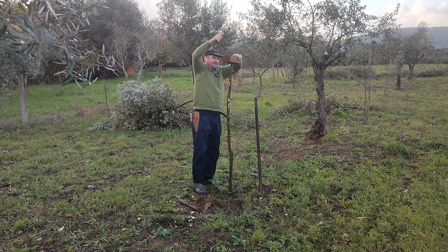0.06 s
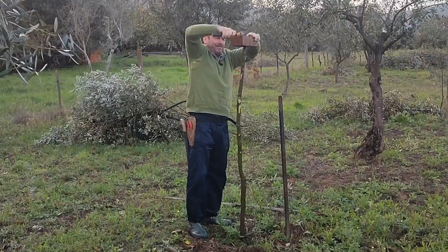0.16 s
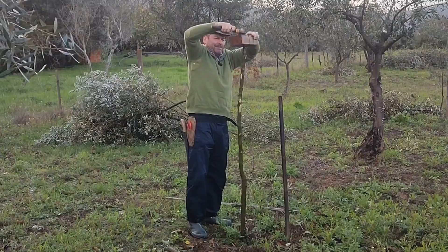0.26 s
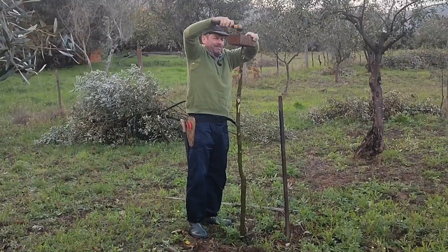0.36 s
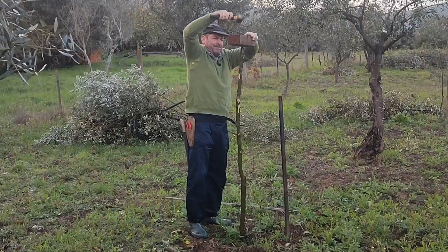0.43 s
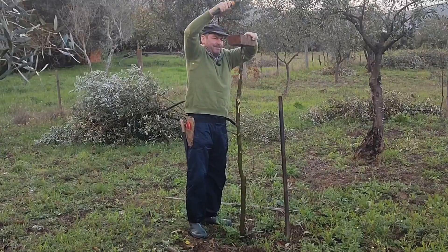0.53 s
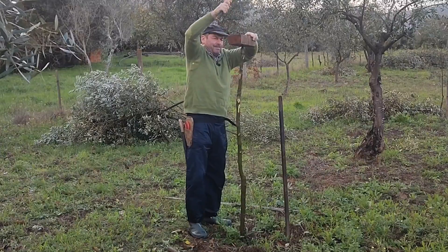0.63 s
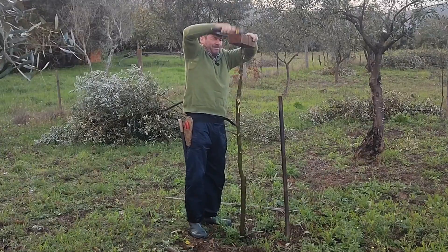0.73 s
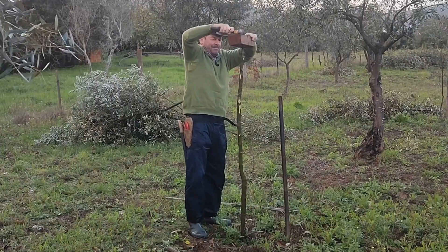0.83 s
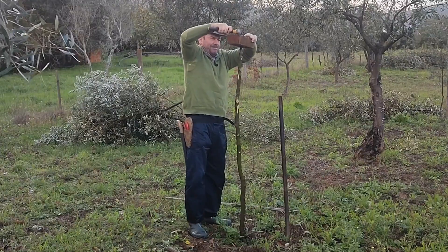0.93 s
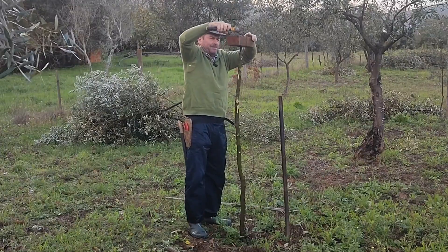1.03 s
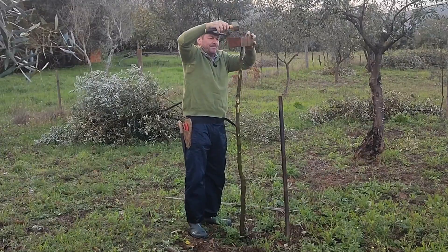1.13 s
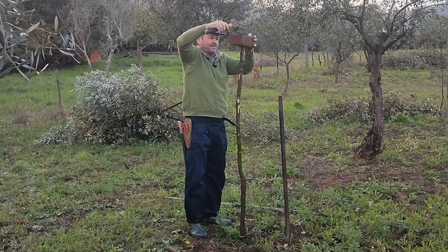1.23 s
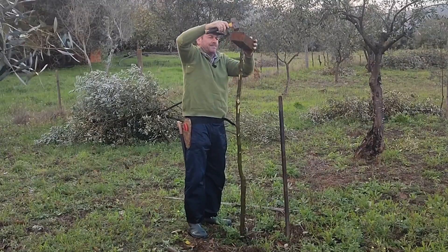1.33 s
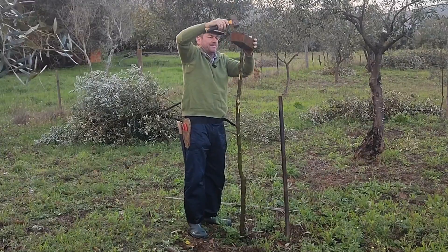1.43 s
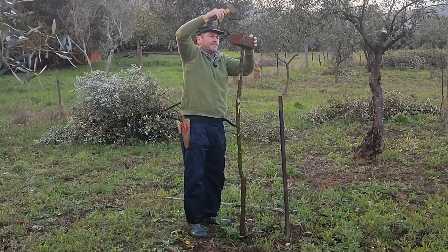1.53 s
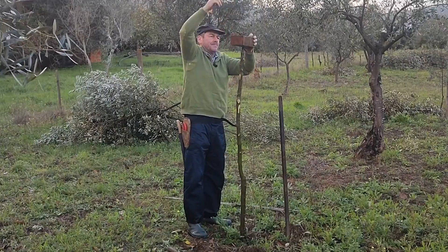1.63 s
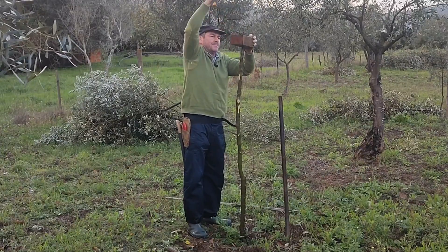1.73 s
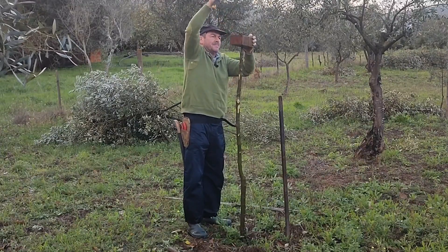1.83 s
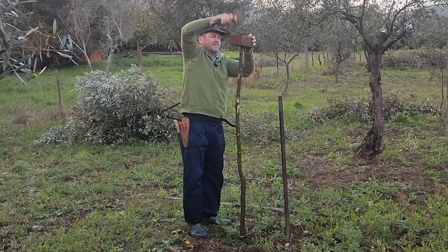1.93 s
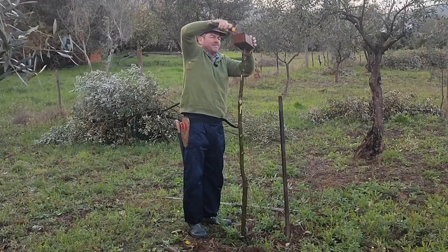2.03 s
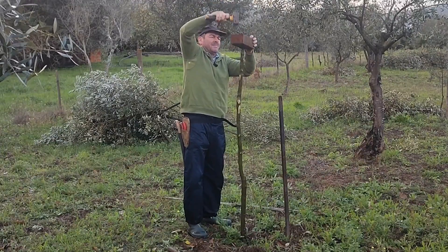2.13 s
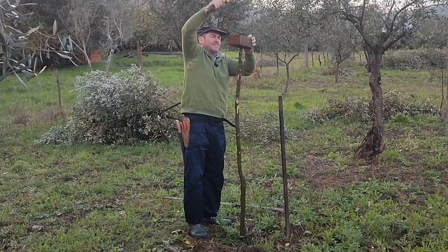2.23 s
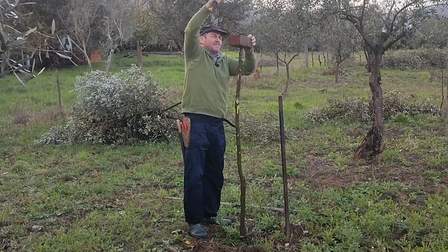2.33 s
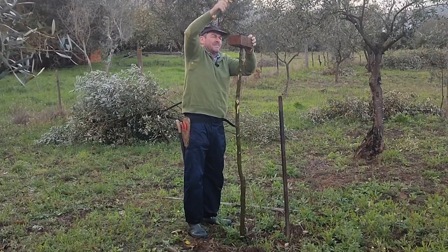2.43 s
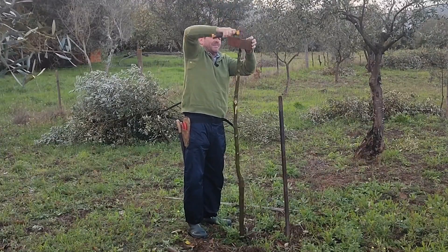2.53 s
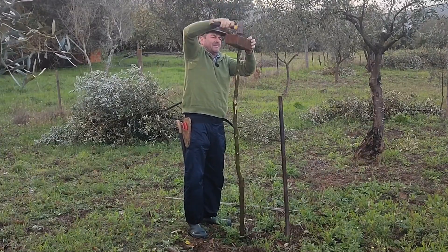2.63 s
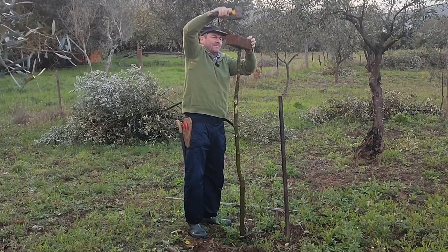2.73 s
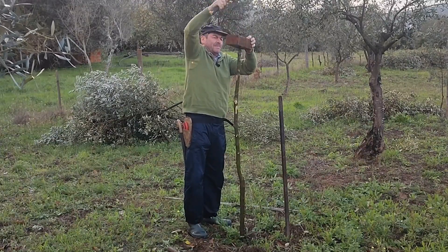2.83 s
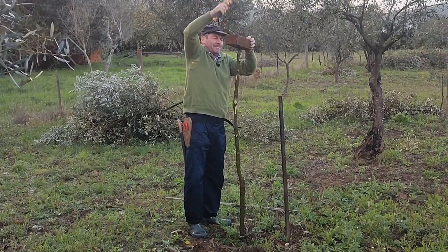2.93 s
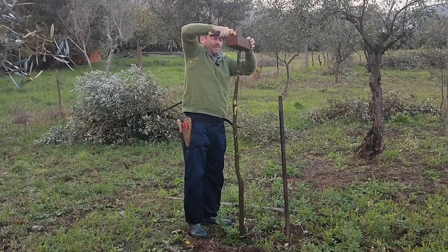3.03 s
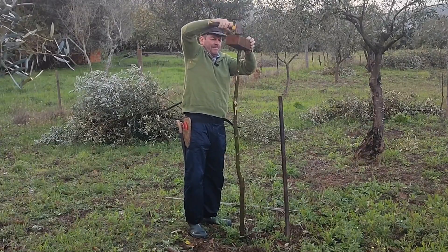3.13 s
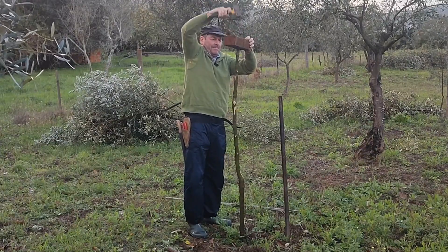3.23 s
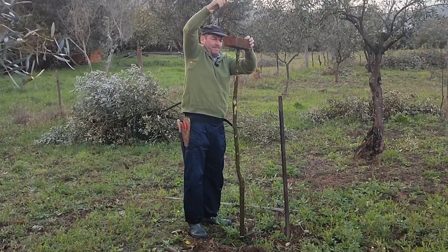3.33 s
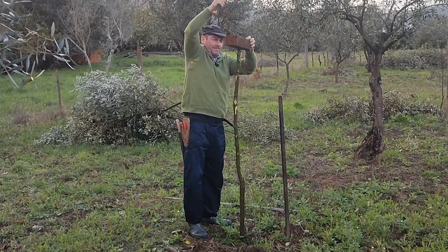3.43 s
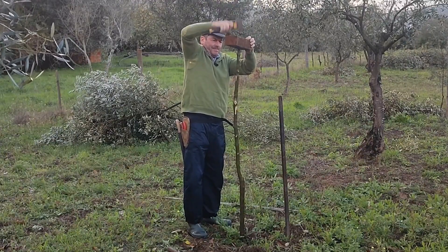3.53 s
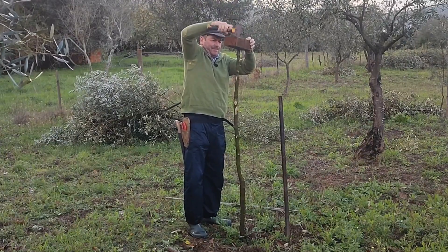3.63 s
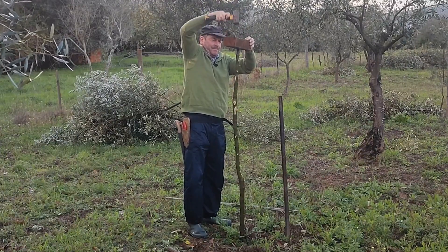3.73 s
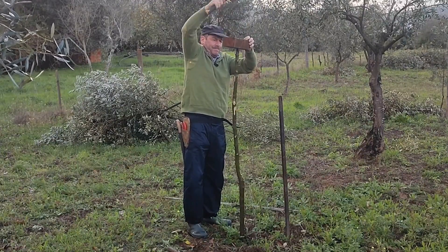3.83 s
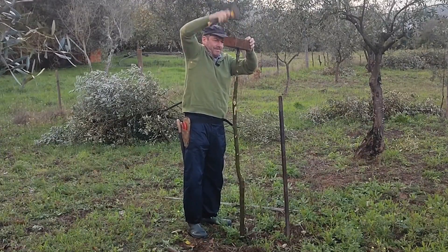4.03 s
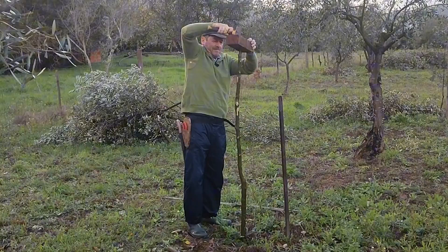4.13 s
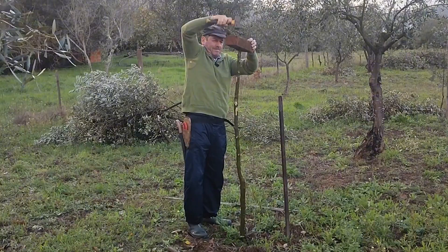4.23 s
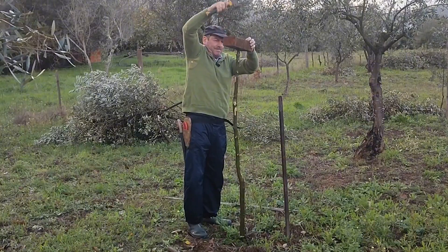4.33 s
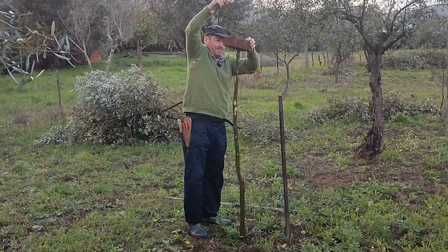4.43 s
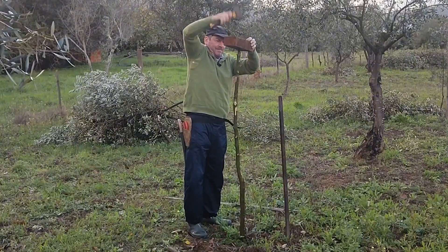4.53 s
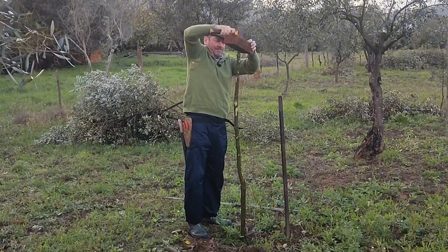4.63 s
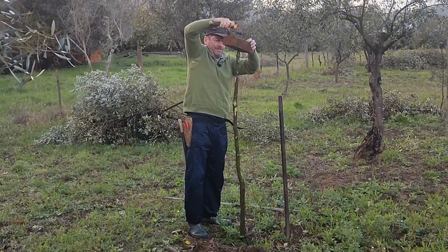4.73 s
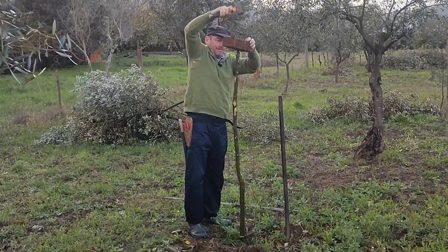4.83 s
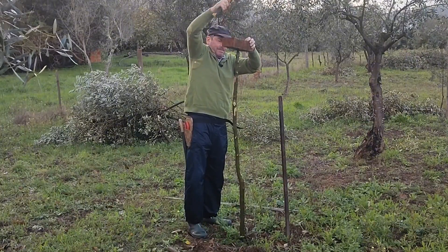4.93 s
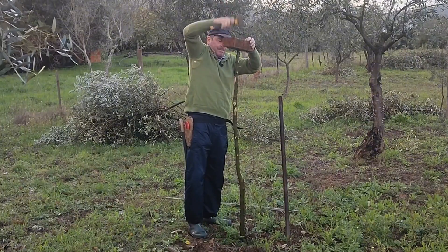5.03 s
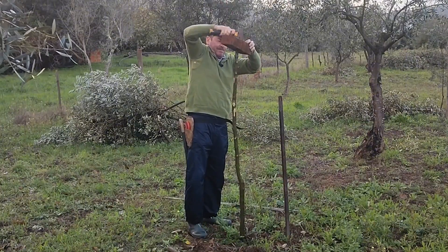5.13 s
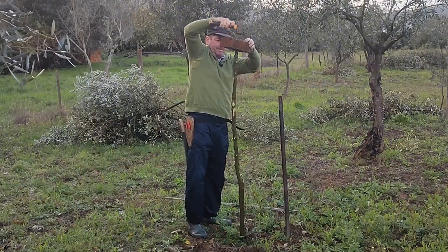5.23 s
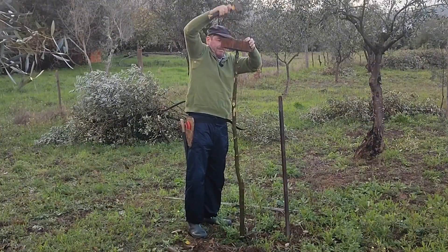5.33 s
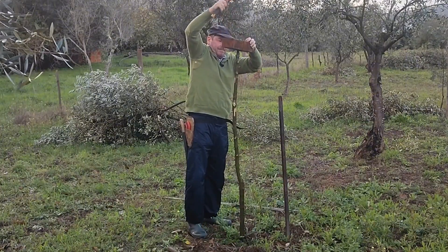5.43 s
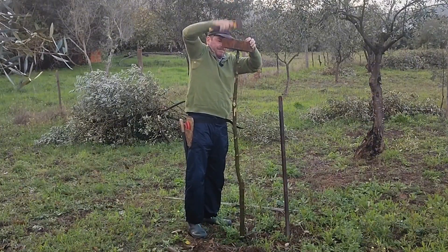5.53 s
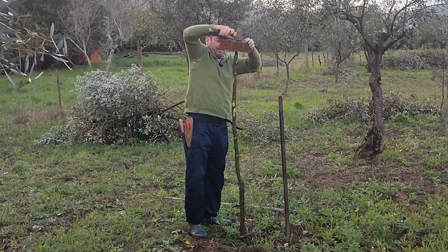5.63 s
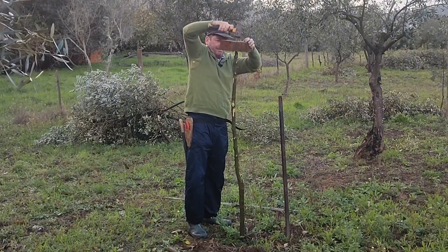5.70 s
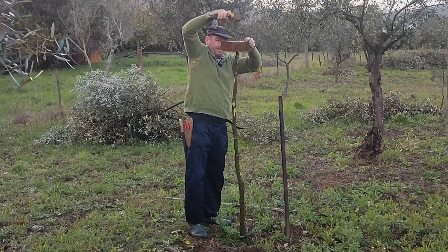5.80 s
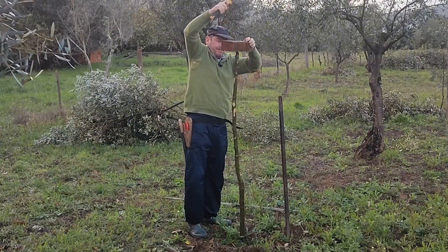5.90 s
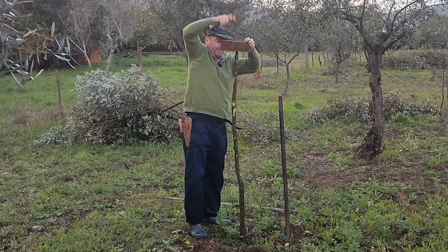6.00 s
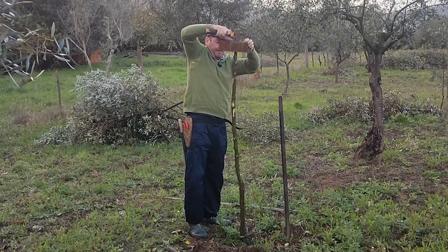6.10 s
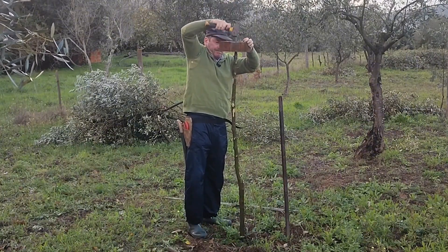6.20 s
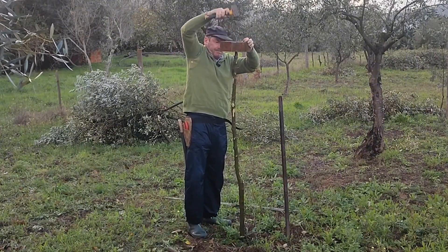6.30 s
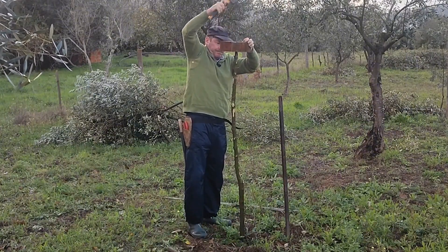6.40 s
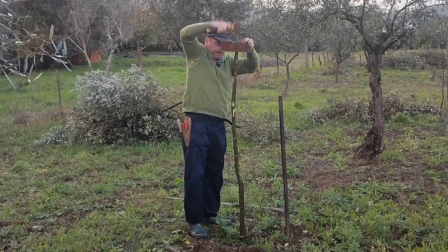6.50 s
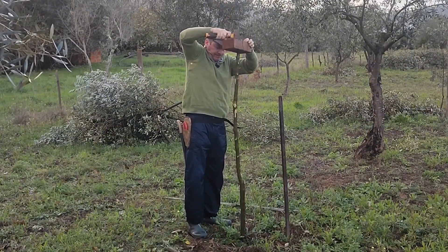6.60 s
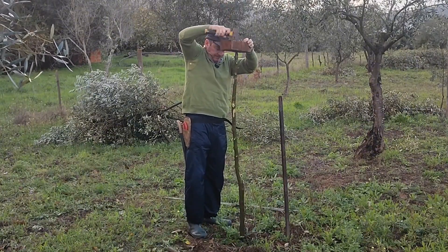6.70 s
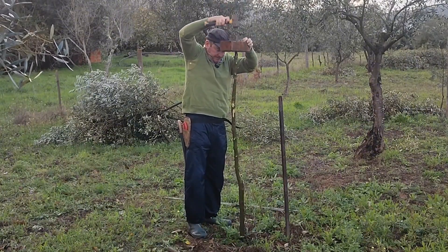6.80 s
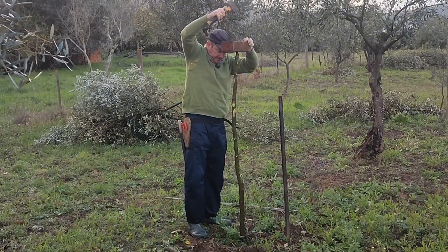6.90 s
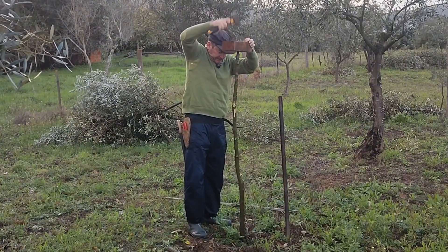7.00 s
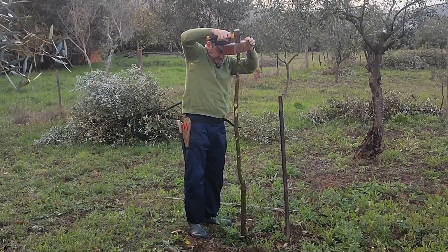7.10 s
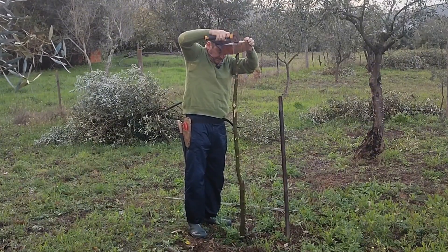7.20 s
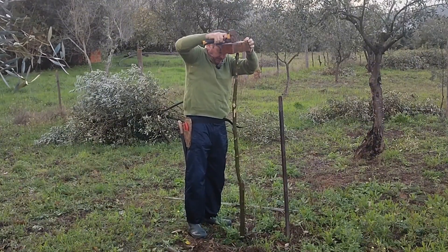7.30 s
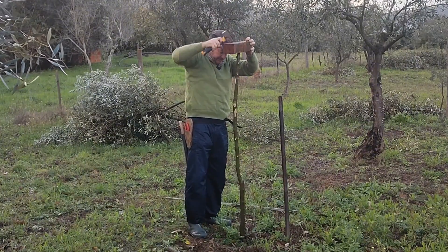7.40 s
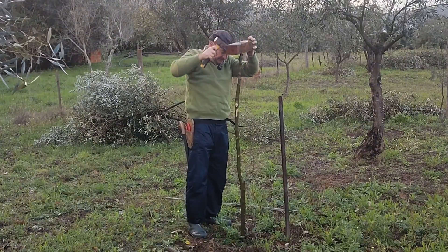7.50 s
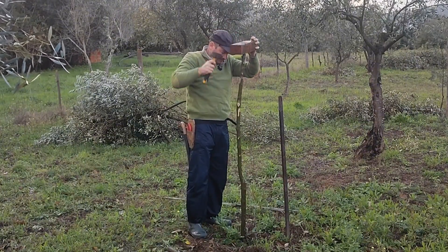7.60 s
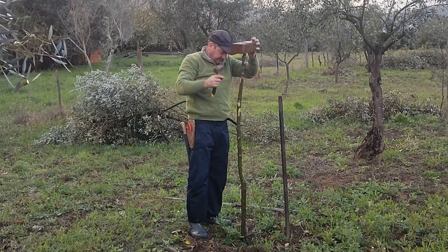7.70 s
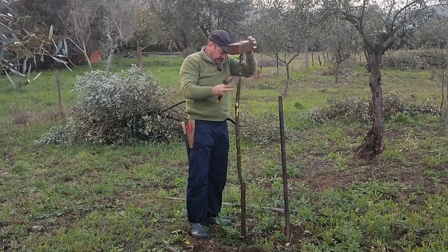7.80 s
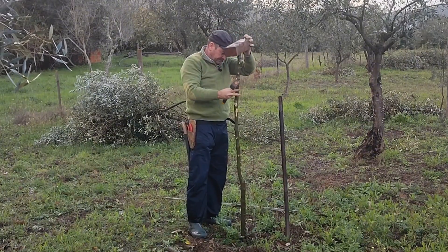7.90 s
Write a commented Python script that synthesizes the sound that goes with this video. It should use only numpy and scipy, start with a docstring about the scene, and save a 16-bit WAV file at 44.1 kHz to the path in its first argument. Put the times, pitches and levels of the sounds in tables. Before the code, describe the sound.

In an open field with scattered trees, a hammer strikes a wooden block on a slim stake thirteen times. Each blow is a short, hollow wooden knock with a bright click, brief rattle and dull thud from the soil, trailing a faint echo off the trees. Low wind buffets the microphone unevenly left and right, over quiet hiss. A far bird calls hoarsely twice, late.

```python
"""Driving a stake in an open field

A hammer strikes a wood block on a slim wooden stake in soft soil, thirteen times.
Each blow runs down the stake as a bending wave, highs first; filters and noise bursts add the ringing
wood, clicks, rattle, a dull return from the soil and a faint echo scattered by trees.
A far bird gives two hoarse harmonic calls. Noise shaped by the breeze buffets two microphone ports,
over a quiet hiss and a soft rush of the field.
"""
import sys
import numpy as np
from scipy import signal
from scipy.fft import rfft, irfft
from scipy.io import wavfile
from scipy.ndimage import uniform_filter1d

SR = 44100
rng = np.random.default_rng(int(sys.argv[2]) if len(sys.argv) > 2 else 0)


def wav_record(signal):
    """Record a signal, one row per channel, as 16-bit PCM in the file named by sys.argv[1]."""
    frames = np.transpose(np.atleast_2d(signal))
    bounded = np.clip(frames, -1, 1)
    # unit amplitude maps onto the largest positive 16-bit level
    quanta = np.round(bounded * 32767).astype(np.int16)
    wavfile.write(sys.argv[1], SR, quanta)


N = 350595  # length in samples


def undb(db):
    """Amplitude ratio: 20 dB is a factor of ten."""
    return 10 ** (np.asarray(db) / 20)


def unit(x):
    """Normalisation to unit mean power, that is rms 1."""
    return x / np.sqrt(np.mean(x ** 2))


def gains(points, size):
    """Frequency response at each FFT bin: (Hz, dB) points joined on a log frequency axis."""
    hz, db = np.transpose(points)
    bin_hz = np.fft.rfftfreq(size, 1 / SR) + 1e-9
    return undb(np.interp(np.log(bin_hz), np.log(hz), db))


def colour(x, points):
    """Zero-phase filtering: multiply the spectrum by the gains of (Hz, dB) points."""
    size = x.shape[-1]
    return irfft(rfft(x) * gains(points, size), size)


def causal(gain):
    """Minimum phase: folding the cepstrum gives a filter that does not sound before it is struck."""
    cepstrum = irfft(np.log(gain))
    half = len(cepstrum) // 2
    cepstrum[1:half] *= 2
    cepstrum[half + 1:] = 0
    return np.exp(rfft(cepstrum))


def pair(size, likeness):
    """Interchannel correlation: common and opposed noise mixed to the given likeness."""
    mid, side = rng.standard_normal((2, size))
    c = np.clip(likeness, 0, 1)
    common = np.sqrt(1 + c) * mid
    opposed = np.sqrt(1 - c) * np.array([side, -side])
    return (common + opposed) / np.sqrt(2)


def walk(rate):
    """Slow random modulation of rms 1: values held 1 / rate seconds, then smoothed twice."""
    hold = max(int(SR / rate), 1)
    steps = np.repeat(rng.standard_normal(N // hold + 1), hold)
    smooth = uniform_filter1d(uniform_filter1d(steps, hold), hold)
    return unit(smooth[:N])


def burst(t, rise_s, t60, likeness):
    """Diffuse decay: spectrum of stereo noise that swells, then falls 60 dB in t60 seconds."""
    shape = (1 - np.exp(-t / rise_s)) * np.exp(-np.log(1000) * t / t60)
    energy = np.sum(shape ** 2)
    return rfft(pair(len(t), likeness) * shape / np.sqrt(energy))


def late(f, s):
    """Pure delay of s seconds: a phase lag proportional to frequency."""
    return np.exp(-2j * np.pi * f * s)


def breeze():
    """Slowly varying flow: strength and left-minus-right lean, interpolated in dB at every sample."""
    # Breeze at the microphone. Each row: time in seconds, relative strength in dB, left minus right in dB.
    breeze_points = [(0.0, -48, -15), (0.38, -42, 7.5), (0.8, -37.5, -14.5), (1.3, -51, 18),
                     (1.8, -45.5, 7), (1.9, -68.5, 8.5), (2.6, -74.5, 7), (2.75, -47.5, 1),
                     (3.199, -42, -8.5), (3.65, -44.0, 19), (3.95, -46.5, 11.5), (4.3, -47, -12),
                     (5.05, -56, -6.5), (5.3, -43.5, -5), (5.85, -32, 2), (6.3, -41.5, 6),
                     (6.85, -49.0, -5), (7.42, -38.5, -15.5), (7.52, -52.5, 1.0), (7.95, -57, -0.5)]
    s, strength_db, lean_db = np.transpose(breeze_points)
    t = np.arange(N) / SR
    return np.interp(t, s, strength_db), np.interp(t, s, lean_db)


def air(hiss_db=-52, field_db=-63, breeze_share=0.22):
    """Stationary noise: steady hiss, and a rush alike in both channels that rises with the breeze."""
    # Still air of the field and microphone hiss. Each row: frequency in Hz, relative level in dB.
    hiss_points = [(20, -8), (60, -14), (180, -2.5), (300, -11.5), (480, 3), (1300, -1.5), (2100, 3),
                   (2900, -7.5), (4500, -1), (5000, -11), (6500, -13.5), (7800, -32.5), (10000, -36.5),
                   (11000, -24.5), (16000, -35)]
    rush_points = [(80, -23), (250, 7), (450, 5.0), (1600, -31.5), (3000, -37.0), (7000, -53)]
    breeze_db = uniform_filter1d(breeze()[0], SR // 4)
    hiss = unit(colour(pair(N, likeness=0.02), hiss_points))
    rush = unit(colour(pair(N, likeness=1.0), rush_points))
    rush_db = field_db + breeze_share * (breeze_db - breeze_db.mean()) + walk(0.86)
    return undb(hiss_db) * hiss + undb(rush_db) * rush


def eddy_noise(points, hold_s):
    """Turbulence: coloured noise whose power is evened out by its running mean over hold_s."""
    noise = colour(rng.standard_normal(N), points)
    power = uniform_filter1d(noise ** 2, max(int(hold_s * SR), 1))
    return noise / np.sqrt(power + 1e-18)


def wind(wind_db=0.5, flutter_db=5.0, eddy_db=-12, eddy_growth=0.21):
    """Flow noise: each port has its own lumps and eddies; stronger flow raises the higher eddies."""
    # Wind rumble. Each row: frequency in Hz, relative level in dB.
    rumble_points = [(12, -42), (25, -30), (42, -3), (60, 0), (110, -4.5), (160, -13.5), (220, -18.5),
                     (300, -25.5), (450, -46), (900, -91.5)]
    # Single eddies that thump a port. Each row: centre in seconds, relative left and right level in dB.
    buffets = [(0.38, -39.5, -33), (0.53, -36, -36), (0.622, -22.5, -47), (1.82, -53, -33),
               (2.688, -35.5, -46.5), (4.437, -34.5, -22), (5.84, -25.5, -23), (7.422, -35.5, -27)]
    eddy_points = [(60, -8), (135, 4.5), (185, -2.5), (260, -23.5), (400, -40), (1200, -72)]
    buffet_s = .016  # time in which a thump swells and dies
    lumps_per_s, lump_db = 16, 3
    t, out = np.arange(N) / SR, []
    strength_db, lean_db = breeze()
    for port, side in enumerate((1, -1)):
        flow = undb(strength_db + side * lean_db / 2 + lump_db * walk(lumps_per_s))
        thumps = sum(undb(port_db[port]) * np.exp(-((t - s) / buffet_s) ** 2 / 2) for s, *port_db in buffets)
        push = np.hypot(flow, thumps)
        push_db = 20 * np.log10(push)
        rumble = eddy_noise(rumble_points, hold_s=0.08)
        eddies = eddy_noise(eddy_points, hold_s=0.063)
        swirl = rumble + undb(eddy_db + eddy_growth * (push_db - push_db.mean())) * eddies
        flutter = unit(undb(flutter_db * walk(45)))
        out.append(undb(wind_db) * push * flutter * swirl)
    return np.array(out)


def bird(upper_db=0, flutter_db=3):
    """Harmonic series: two hoarse calls sag in pitch; only harmonics 3 to 5 sound at this distance."""
    # Calls of the far bird. Each row: start in seconds, length in seconds, relative level in dB.
    calls = [(5.401, .17, -60), (6.03, .36, -55)]
    call_hz, call_sag_hz, hoarse_hz = 535, 80, 11  # starting fundamental, its fall, its rms jitter
    t, out = np.arange(N) / SR, np.zeros(N)
    for s, length, db in calls:
        u = np.clip((t - s) / length, 0, 1)  # progress through the call
        pitch = call_hz - call_sag_hz * u ** 2 + hoarse_hz * walk(150)
        phase = 2 * np.pi * np.cumsum(pitch) / SR
        third, fourth, fifth = np.sin(np.outer([3, 4, 5], phase))
        voice = third + undb(upper_db) * u * (2 * fourth + fifth / 2)  # the call brightens as it goes
        swell = np.sqrt(np.abs(np.sin(np.pi * u)))
        out += undb(db + flutter_db * walk(45)) * swell * voice
    scatter = irfft(burst(t[:SR], rise_s=0.0016, t60=0.093, likeness=.3))
    return out + signal.fftconvolve(out[None], scatter, axes=1)[:, :N]


def contact_colour(thud_db, knock_db, hardness_db, clack_db):
    """Contact time: a harder contact is shorter, so brighter; a hollow clack rises near 1.3 kHz and weakens the
    ring above it."""
    # Contact of hammer and block above the knock. Each row: frequency in Hz, level over the knock in dB,
    # share of the hardness (ratio), share of the clack (ratio).
    contact_rows = [(1277, 6.5, 0.22, 1), (2064, -1.03, 0.42, -.65), (4600, -0.37, 0.89, 0.019),
                    (11000, -1.8, 0.48, 0.11)]
    thud_hz, knock_hz = 327, 736  # the thud holds below the first, the knock takes over at the second
    points = [(thud_hz, thud_db), (knock_hz, knock_db)]
    for hz, db, hard, hollow in contact_rows:
        points.append((hz, knock_db + db + hard * hardness_db + hollow * clack_db))
    return points


def bending(f, lag_s, knee_hz):
    """Dispersion: stiff wood carries highs fastest; lows lag by lag_s, giving a quick falling chirp."""
    return -np.exp(-2j * np.pi * lag_s * knee_hz * np.arctan(f / knee_hz))


def soil_return(f, lag_s, centre_hz, width_hz, db):
    """Reflection with loss: a delayed, narrow resonance leaves only a low thud of the wave."""
    return undb(db) * late(f, lag_s) / (1 + 1j * (f - centre_hz) / width_hz) ** 2


def wood_ring(f, place):
    """Modal resonance: the strike place decides which damped modes of the wood speak."""
    # Modes of block and stake. Each row: frequency in Hz, level over the wave in dB, t60 in seconds,
    # change in dB per unit of strike place.
    wood_modes = [(605.5, -2, 0.072, 4.5), (879, -12.5, 0.049, 5), (1232, 0.5, 0.096, 1),
                  (1890, -7.5, 0.076, 13.5), (1971, 6.5, 0.051, 12), (2090, 11.5, 0.044, -3),
                  (2489, 11, 0.023, -5.5), (2626, -1.5, 0.023, -8), (3296, 2.5, 0.027, 10.5),
                  (3690, 10, 0.031, 5), (3970, 14, 0.031, 1), (4720, -8, 0.1, -1), (5680, 14.5, 0.031, 3.5)]
    ring = 0
    for hz, db, t60, lean_db in wood_modes:
        detuning = 2j * np.pi * (f - hz) * t60 / np.log(1000)
        ring = ring + undb(db + lean_db * place) / (1 + detuning)
    return ring


def stake_wave(f, place, stray, size):
    """Superposition: the direct bending wave, its returns from the foot and the ringing wood."""
    # Bending wave of an average blow. Each row: frequency in Hz, relative level in dB.
    wave_points = [(40, 2.5), (120, 13), (220, 23.5), (400, 30), (600, 23), (830, 22.5), (1050, 17),
                   (1350, 6), (1700, 7), (2200, 7), (3000, -1), (5800, -18.5), (7000, -52), (8500, -49)]
    wave = gains(wave_points, size) * bending(f, lag_s=.0052 * (1 + 0.027 * stray[0]), knee_hz=1699)
    foot = soil_return(f, lag_s=0.00389 * (1 + 0.12 * stray[1]),
                       centre_hz=340 * (1 + .03 * stray[2]), width_hz=110, db=3)
    # the stake springs back
    recoil = soil_return(f, lag_s=0.03 * (1 + 0.093 * stray[3]), centre_hz=369, width_hz=45, db=-15.0)
    # standing waves need one trip to build
    ring = wood_ring(f * (1 + 0.0034 * stray[3]), place) * late(f, 0.001683)
    return wave * (1 + foot + recoil + ring)


def contact_clicks(t, f, stray, size):
    """Impact noise: the hammer clicks on the block, then the block slaps back on the stake."""
    hammer_points = [(3000, 10.5), (6500, 5.0), (8200, -14), (10000, -15.5), (11500, -16.5)]
    slap_points = [(3000, 15), (6000, 20.0), (8500, -25), (11500, -9)]
    hammer = undb(-15.5) * burst(t, rise_s=0.00064, t60=0.0047, likeness=.05) * late(f, 0.000542)
    slap = undb(-25) * burst(t, rise_s=0.00094, t60=0.0054, likeness=.2)
    slap = slap * late(f, 0.0051 + 0.00079 * stray[2])
    return hammer * causal(gains(hammer_points, size)) + slap * causal(gains(slap_points, size))


def wood_rattle(t, size):
    """Scattering: the rattle of block and bark leaves the ground as a decaying noise burst."""
    # Rattle of block and bark. Each row: frequency in Hz, relative level in dB.
    rattle_points = [(100, -11), (350, 14), (700, 16.5), (1100, 5), (1600, 7), (2100, 13.5), (3000, 0),
                     (4200, -2), (6000, -12.5), (7000, -16), (8200, -45), (10000, -30), (11500, -24),
                     (16000, -25.5)]
    return causal(gains(rattle_points, size)) * burst(t, rise_s=0.00048, t60=0.087, likeness=0.68)


def tree_echo(t, f, size):
    """Backscatter: foliage returns mostly short waves as a diffuse tail, trunks return single echoes."""
    # Share of a blow that the trees send back. Each row: frequency in Hz, relative level in dB.
    foliage_points = [(150, -37), (500, -31.5), (1200, -28), (2100, -20.5), (3000, -16), (4200, -17),
                      (6500, -25.5), (9000, -21)]
    # Single echoes from near trunks. Each row: delay in seconds, relative level in dB.
    trunk_echoes = [(.065, -36.5), (0.116, -41)]
    trunk_points = [(500, -22.5), (2000, 8.5), (6000, -2)]
    foliage = causal(gains(foliage_points, size)) * burst(t, rise_s=0.012, t60=0.71, likeness=0.085)
    trunks = sum(undb(db) * late(f, s) for s, db in trunk_echoes)
    return foliage + trunks * causal(gains(trunk_points, size))


def blow(contact_points, place, size=32768):
    """Linear system: the contact excites stake, clicks and rattle, and the trees echo their sum."""
    t, f = np.arange(size) / SR, np.fft.rfftfreq(size, 1 / SR)
    stray = rng.standard_normal(4)  # small variations of this blow
    near = stake_wave(f, place, stray, size) + contact_clicks(t, f, stray, size) + wood_rattle(t, size)
    contact = causal(gains(contact_points, size))
    lead_in = late(f, size // 8 / SR)  # room ahead of the blow
    return irfft(contact * near * (1 + tree_echo(t, f, size)) * lead_in)


def hammering():
    """Repeated impacts: the blows superpose, each at its own moment."""
    # Hammer blows. Each row: time in seconds, low thud in dB, knock in dB, hardness of the contact
    # in dB of treble before its shares, hollow clack in dB before its shares,
    # strike place on the block (no unit, 0 = middle).
    blows = [(0.2793, -6.5, -2, 17, 3.5, 1.65), (0.8612, -8.5, -1, -5, 2, 0.4),
             (2.0792, -11, -4, 3.5, 0, 0.57), (2.6329, -10, 4, 2, -0.5, .1),
             (3.134, -2.1, -4.5, -1.5, 5, 0.36), (3.6693, -1.5, -2.2, -1.5, 3.3, .3),
             (4.1886, -2, 2.7, 9.5, 3, 0.86), (4.6889, -1.5, 4.5, -4.5, 3, 0.92),
             (5.1776, -3, 2.5, -2, -2, -1.3), (5.6718, -2.5, 1.1, -3, -2.5, -0.7),
             (6.153, -3.1, 4, 4, -1.5, -1.03), (6.636, -2, 2.5, -0.5, 4, -0.44),
             (7.1546, -1.5, -4, -9.5, 2, 0.66)]
    out = np.zeros((2, N + 2 * SR))  # one second of margin at each end
    for s, thud_db, knock_db, hardness_db, clack_db, place in blows:
        sound = blow(contact_colour(thud_db, knock_db, hardness_db, clack_db), place)
        size = sound.shape[1]
        start = int(s * SR) + SR - size // 8
        out[:, start:start + size] += sound
    return out[:, SR:SR + N]


def scene():
    """Superposition of still air, wind, the far bird and the hammering."""
    return air() + wind() + bird() + hammering()


def record(dry):
    """Band limiting: peaks are held at full scale, then a steep low-pass cuts the top."""
    top_hz = 15900
    low_pass = signal.ellip(8, .2, 70, top_hz, fs=SR, output="sos")  # 0.2 dB ripple, 70 dB rejection
    return signal.sosfilt(low_pass, np.clip(dry, -1, 1))


dry = scene()
out = record(dry)
wav_record(out)
```